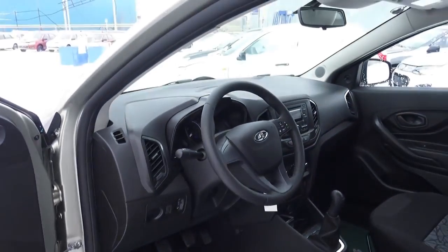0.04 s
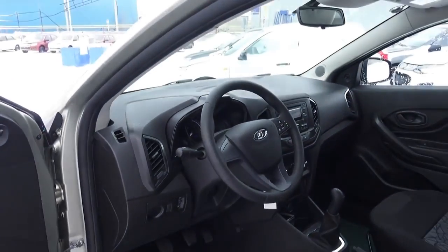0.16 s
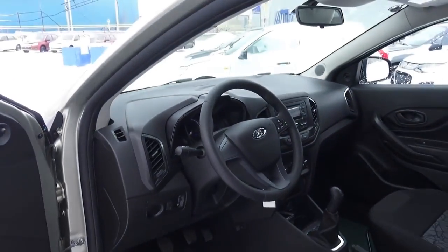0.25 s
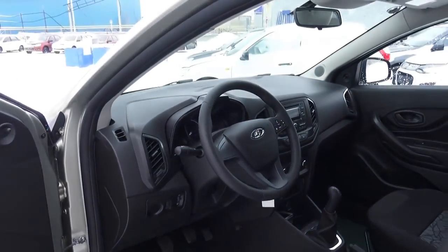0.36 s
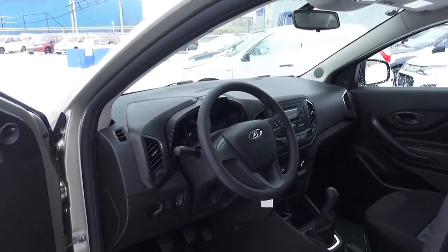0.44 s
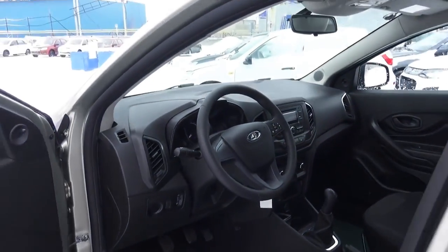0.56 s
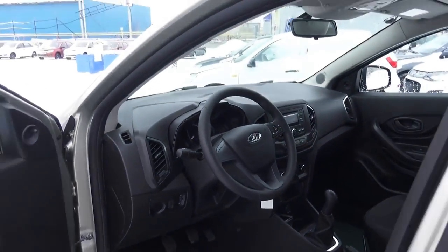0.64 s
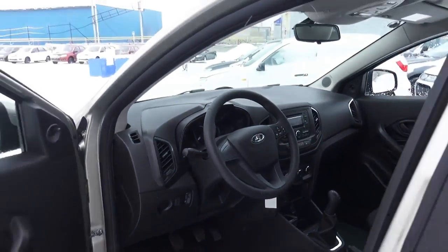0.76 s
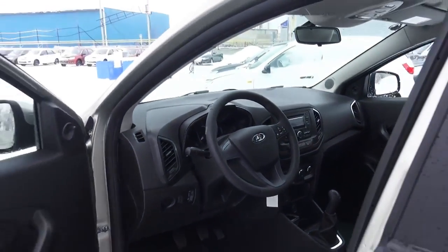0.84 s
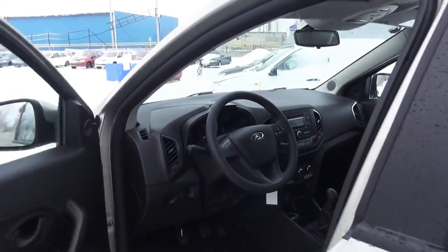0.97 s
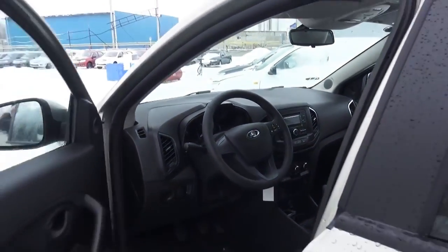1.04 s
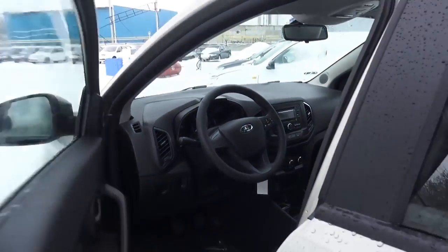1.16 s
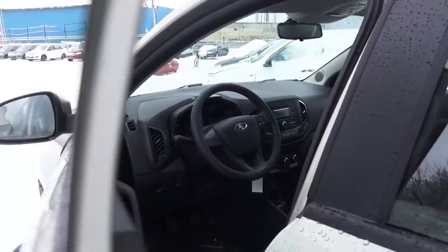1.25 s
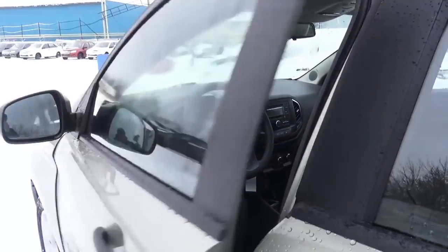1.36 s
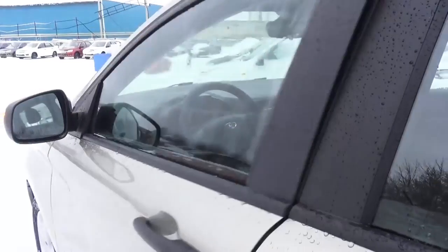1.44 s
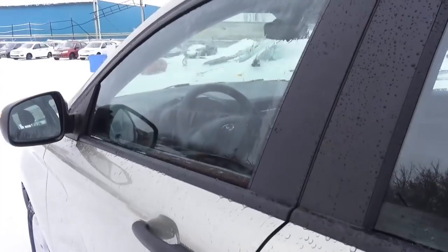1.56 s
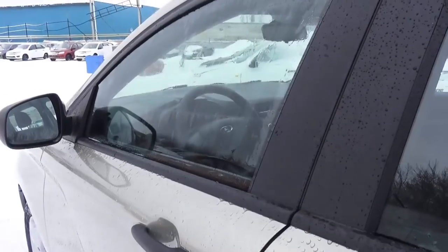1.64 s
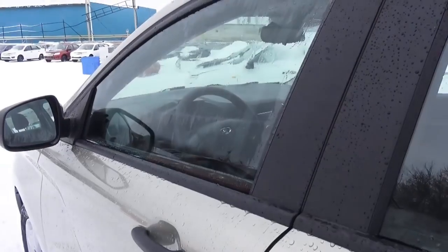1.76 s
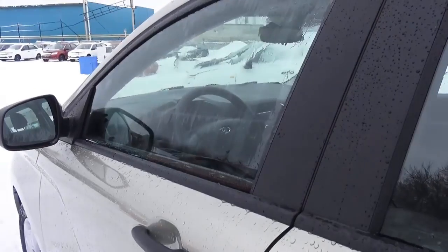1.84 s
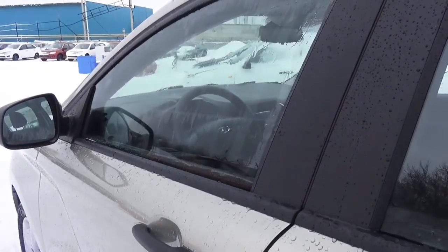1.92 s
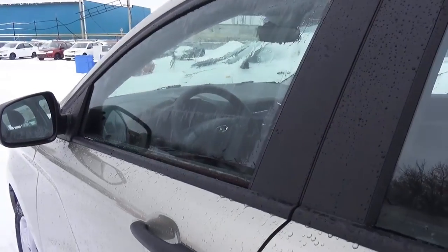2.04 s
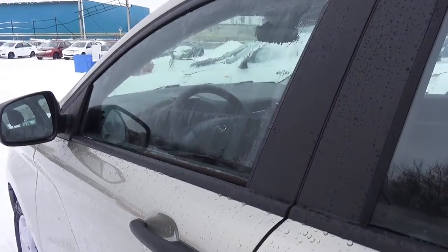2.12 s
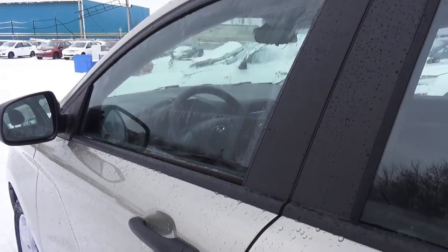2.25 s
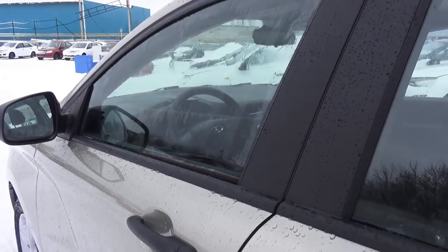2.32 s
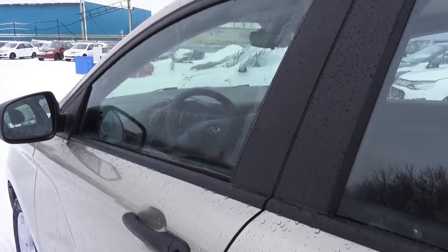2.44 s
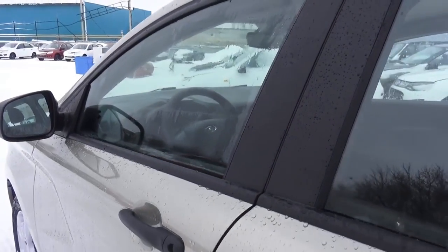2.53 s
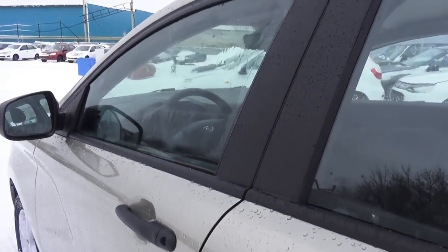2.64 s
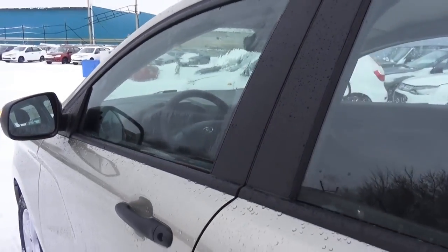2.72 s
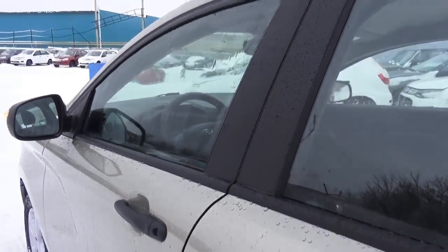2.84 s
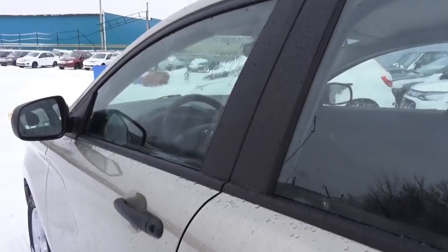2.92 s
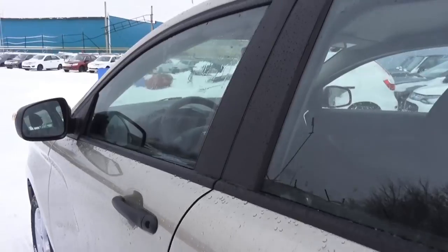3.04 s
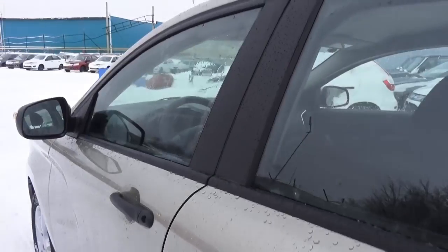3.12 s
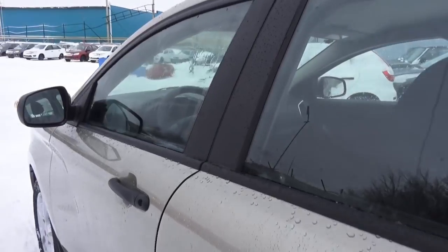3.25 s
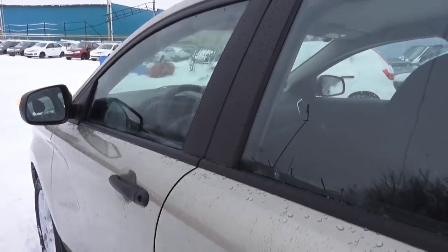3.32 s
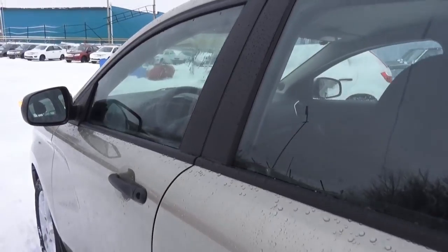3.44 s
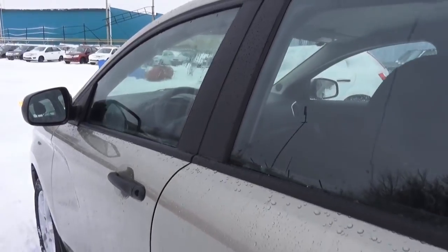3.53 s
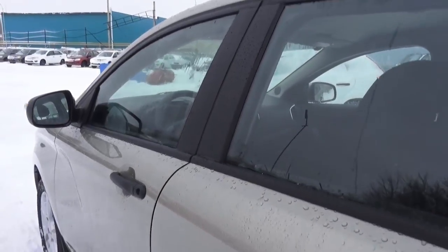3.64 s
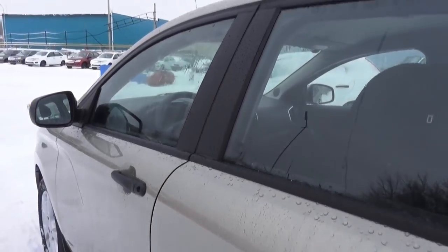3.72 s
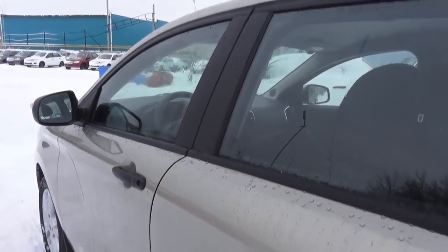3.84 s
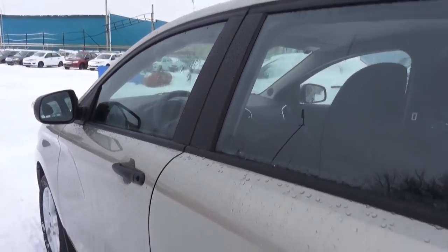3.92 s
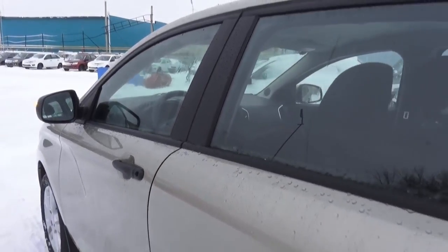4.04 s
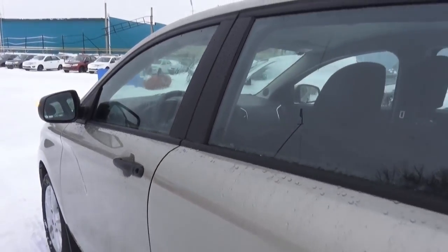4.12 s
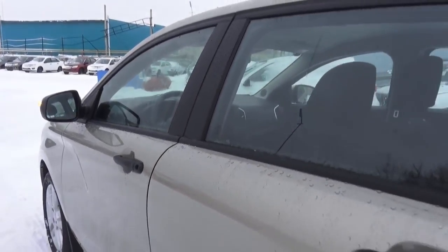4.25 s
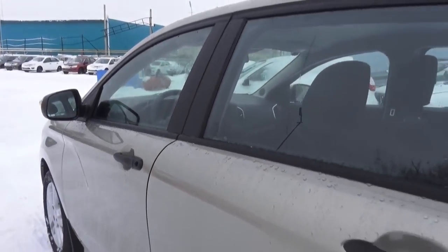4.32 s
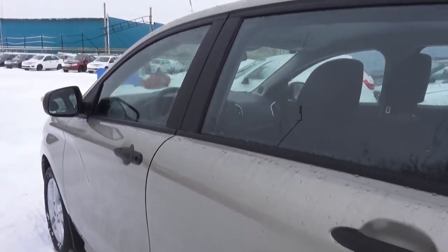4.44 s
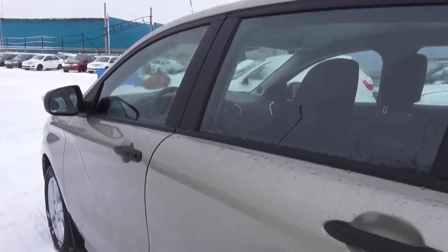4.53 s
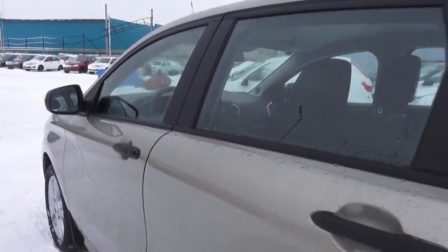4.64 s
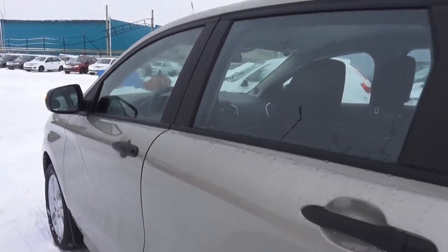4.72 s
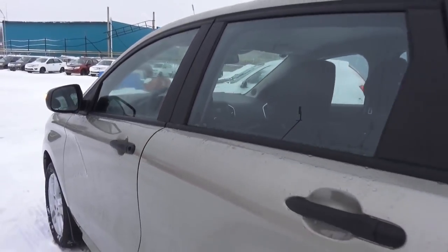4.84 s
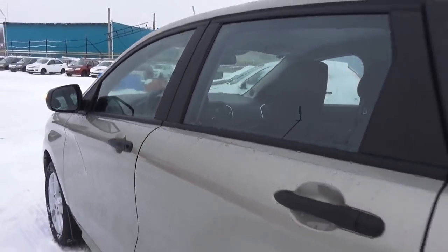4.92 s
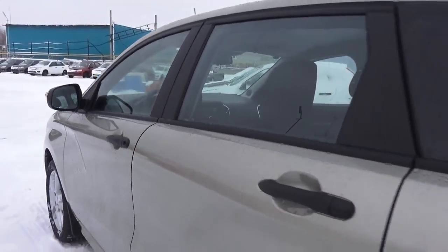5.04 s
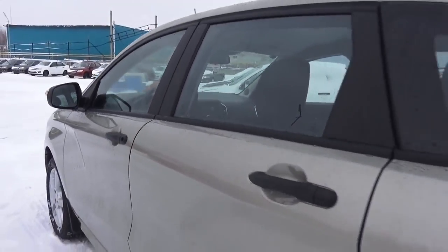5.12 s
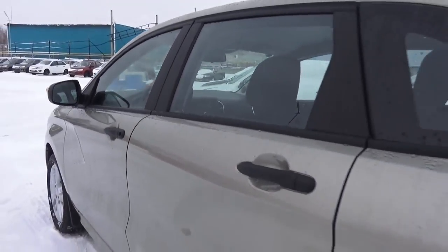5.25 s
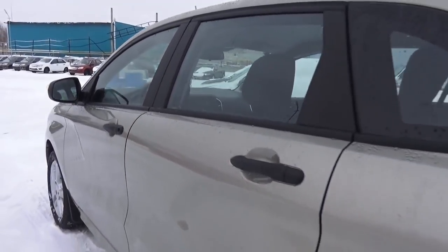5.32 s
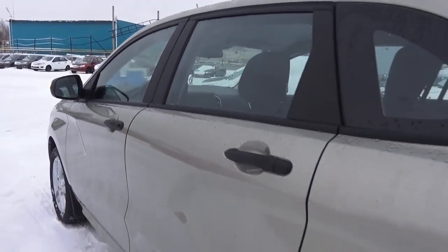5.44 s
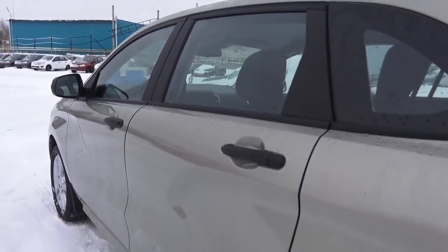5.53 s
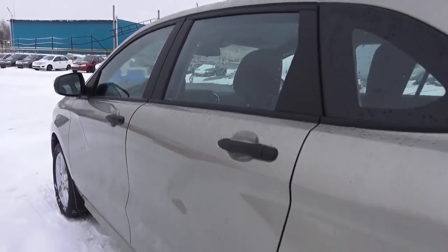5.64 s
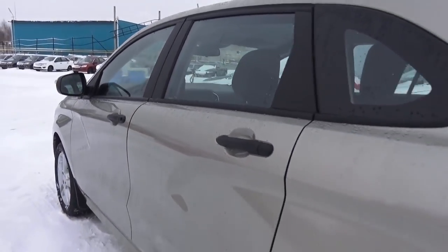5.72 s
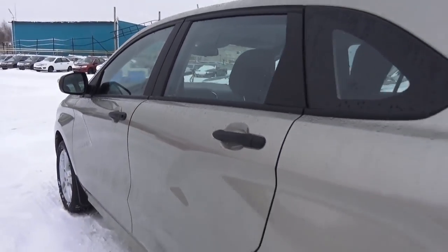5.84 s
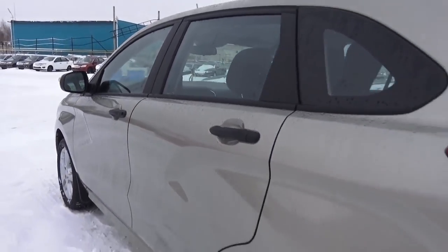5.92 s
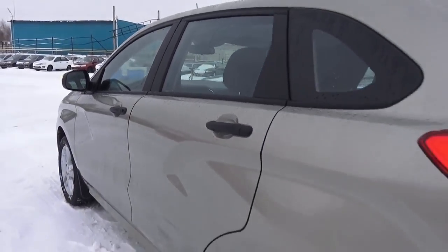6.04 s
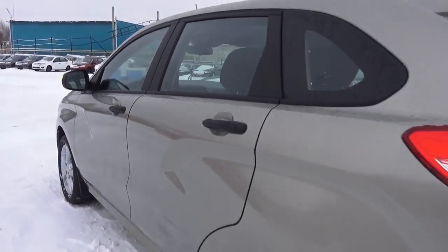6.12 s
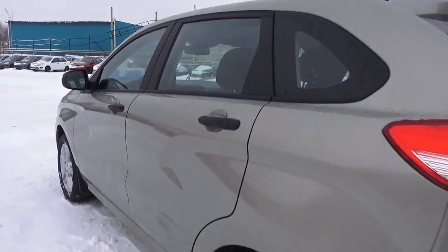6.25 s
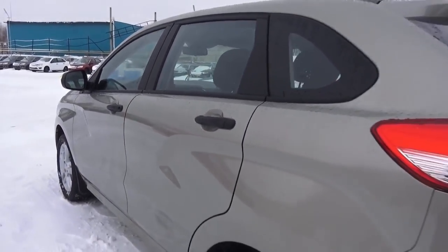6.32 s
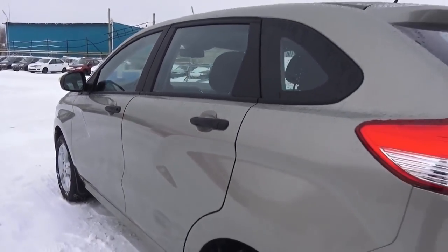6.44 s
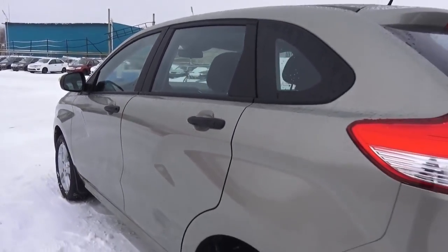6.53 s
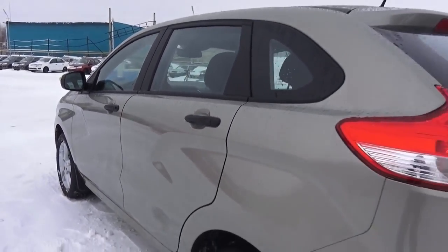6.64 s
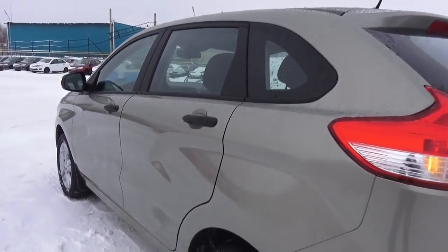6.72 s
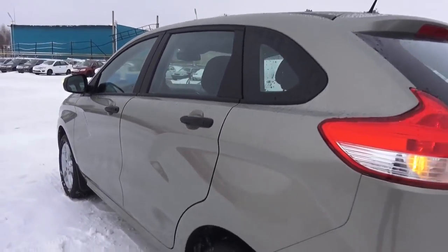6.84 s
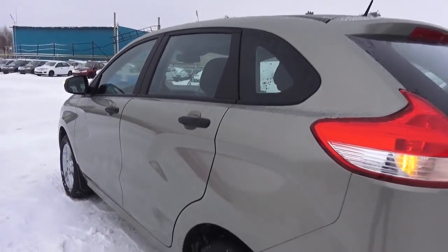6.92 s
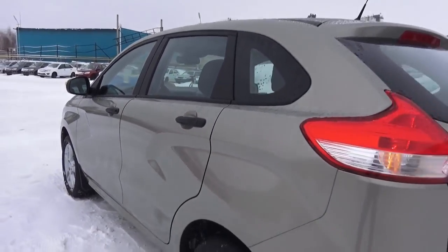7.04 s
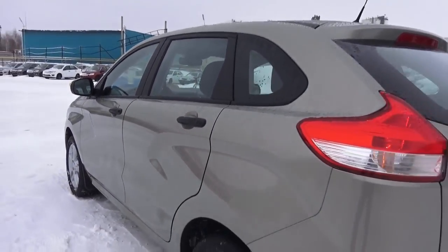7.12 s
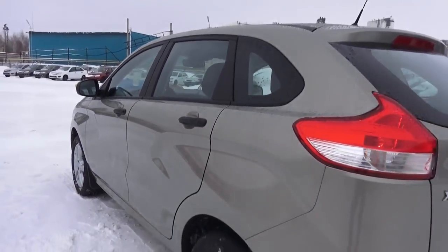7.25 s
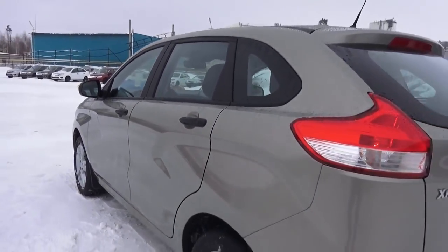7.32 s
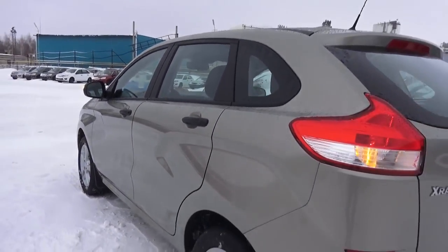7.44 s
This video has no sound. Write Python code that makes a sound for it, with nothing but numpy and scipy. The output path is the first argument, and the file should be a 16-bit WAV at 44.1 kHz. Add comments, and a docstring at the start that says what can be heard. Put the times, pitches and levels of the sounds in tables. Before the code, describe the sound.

A low engine idle hums steadily as a car door knocks, slams shut with a boom, then small ticks and rumbling gusts follow.

```python
"""A snowy lot, where a car idles while someone beside it swings the driver's door past its check and slams it.
Steel, door shell, panels and cabin air ring as damped modes; the latch adds noise bursts as it clatters.
The engine is a hum of firing-rate partials with throbbing noise, and the exhaust grows as we move back.
Filtered noise and low pushes make the gusts at the microphone; chirps, ticks, scuffs and cloth add detail.
Loud treble makes the gain control duck, then slowly recover."""
import sys
import numpy as np
from scipy.fft import rfft, irfft, next_fast_len
from scipy.io import wavfile
from scipy.ndimage import uniform_filter1d, minimum_filter1d, map_coordinates

SR = 44100
rng = np.random.default_rng(int(sys.argv[2]) if len(sys.argv) > 2 else 0)


def int16_out(signal):
    """Quantize to a 16-bit WAV file."""
    q = np.round(np.clip(np.atleast_2d(signal).T, -1, 1) * 32767)
    wavfile.write(sys.argv[1], SR, q.astype(np.int16))


N = 329868  # length in samples


def amp(db):
    """Decibels to gain."""
    return 10 ** (np.asarray(db) / 20)


def unit(x):
    """Scale to rms 1."""
    return x / np.sqrt(np.mean(x ** 2) + 1e-20)


def along(points, hz):
    """Read a curve of (Hz, value) points along a log frequency axis."""
    point_hz, value = np.transpose(points)
    return np.interp(np.log(hz + 1), np.log(point_hz + 1), value)


def curves(rows):
    """One value per sample for each column after the time."""
    s, *columns = np.transpose(rows)
    return [np.interp(np.arange(N) / SR, s, column) for column in columns]


def wobble(rate):
    """A smooth random curve with rate knots a second."""
    knots = rng.standard_normal(int(N * rate / SR) + 4)
    return map_coordinates(knots, [np.arange(N) * rate / SR])


def filtered(x, response):
    """Shape the spectrum of x with a gain that depends on frequency."""
    n = x.shape[-1]
    padded = next_fast_len(n + 8192)
    spectrum = rfft(x, padded) * response(np.fft.rfftfreq(padded, 1 / SR))
    return irfft(spectrum, padded)[..., :n]


# stereo width of the noises: pitch_hz, side_minus_mid_db
STEREO_WIDTH = [(60, -41), (150, -11.5), (330, -16.5), (800, -14), (1700, -14), (2600, -29), (4200, -20),
                (6400, 1), (10000, -3.5)]


def noise(colour_db, size=N):
    """Stereo noise of rms 1, nearly mono in the deep bass and wide in the treble."""
    def mid_side_gain(hz):
        mid_db = colour_db(hz)
        return amp([mid_db, mid_db + along(STEREO_WIDTH, hz)])

    mid, side = filtered(rng.standard_normal((2, size)), mid_side_gain)
    return unit(np.array([mid + side, mid - side]))


def rush(spectrum, size=N):
    """Noise with a (Hz, dB per Hz) spectrum, at rms 1."""
    return noise(lambda hz: along(spectrum, hz), size=size)


def fade(t, t60, attack):
    """A quick rise and an exponential decay."""
    return np.exp(-np.log(1000) * t / t60) * (1 - np.exp(-t / attack))


def swell(t, length, attack, release):
    """Rise, hold until length, then die away."""
    return np.clip(t / attack, 0, 1) * np.exp(-np.maximum(t - length, 0) / release)


def arch(t, length):
    """A rounded rise and fall that lasts for length."""
    return np.sin(np.pi * np.clip(t / length, 0, 1))


def ring(modes, t, attack, scatter_db, detune=.01):
    """Damped modes, a little different in strength and pitch at each blow."""
    out = 0
    for hz, db, t60 in modes:
        strength, bend = rng.standard_normal(2)
        tone = np.sin(2 * np.pi * hz * (1 + bend * detune) * t)
        out = out + amp(db + scatter_db * strength) * fade(t, t60, attack) * tone
    return out


def add(track, s, sound):
    """Mix a sound into a track at time s."""
    part = track[:, round(s * SR):][:, :sound.shape[-1]]
    part += sound[..., :part.shape[-1]]


# ring of the latch steel: pitch_hz, level_db, t60_s
STEEL_MODES = [(1150, -1, .05), (1310, 0, .045), (1440, -1, .04), (1610, -5, .055), (2250, -12, .04),
               (2720, -8, .05), (3330, -13, .04), (3770, -11, .045), (4240, -10, .042), (4570, -15, .035),
               (5320, -20, .035), (5990, -17, .04), (8620, -24, .02)]
STEEL_SCATTER_DB = 5.5  # each mode drops by a random share of this


def clack(brightness_db, t):
    """The latch steel rings on the same pitches at every contact, tilted by brightness in dB per octave."""
    out = 0
    for hz, db, t60 in STEEL_MODES:
        strength, cycle = rng.random(2)
        tilt_db = brightness_db * np.log2(hz / STEEL_MODES[1][0])
        mode_db = db + tilt_db + STEEL_SCATTER_DB * (strength - 1.0)
        out = out + amp(mode_db) * fade(t, t60, attack=.0001) * np.sin(2 * np.pi * (hz * t + cycle))
    return out


# latch and window contacts of the slam:
# start_s, steel_ring_db, brightness_db_per_octave, clank_db, crack_db, t60_s
LATCH_CONTACTS = [(1.5186, -10.5, -.5, -24, -27, .03), (1.5234, -13, -4, -23, -31, .03),
                  (1.5292, -19, 0, -14, -24, .014), (1.5332, -34, 3, -21, -25, .08),
                  (1.5425, -22, 2.5, -18, -18, .07), (1.55, -30, 2, -13, -27, .035),
                  (1.5566, -25.5, 6, -20, -15, .05), (1.5622, -27, 2, -17.5, -27, .085),
                  (1.5918, -26, 3.5, -19, -21, .047)]
# spectrum of the low clank: pitch_hz, density_db_per_hz
CLANK_SPECTRUM = [(240, -22), (400, 3.5), (553, -9), (861, -2), (1180, -14), (1420, -3), (1870, -15.5),
                  (3250, -23), (3540, -20), (4600, -23), (5010, -34), (6140, -39), (7000, -40), (9100, -62),
                  (15400, -120)]
# spectrum of the bright crack: pitch_hz, density_db_per_hz
CRACK_SPECTRUM = [(1060, -29), (1800, 0), (2680, 0), (3180, -4.5), (4410, -4.5), (5080, -10), (6100, -10.5),
                  (7850, -14.5), (8730, -10.5), (12200, -19.5), (14200, -42), (15000, -99)]
SQUEEZE_DB, SQUEEZE_HISS_DB = -25, -37
SQUEEZE_T60_S = .11  # a reversed decay, so it climbs 60 dB in this time
LATCH_WIDTH = .5  # share of side kept: the latch is close and in front
SNAP_T60_S, SNAP_DB, CHATTER_DB, CHATTER_PER_S = 0.0049, -26, 2.5, 900


def latch():
    """Air rushes from the narrowing gap until the latch strikes; loose parts chatter after each snap."""
    out, t = np.zeros((2, N)), np.arange(SR // 2) / SR
    air = amp(SQUEEZE_DB) * rush(CLANK_SPECTRUM, size=len(t))
    air = air + amp(SQUEEZE_HISS_DB) * rush(CRACK_SPECTRUM, size=len(t))
    squeeze = air * fade(t, SQUEEZE_T60_S, attack=0.0018)[::-1]
    add(out, LATCH_CONTACTS[0][0] - len(t) / SR, squeeze)
    for s, steel_db, brightness_db, clank_db, crack_db, t60 in LATCH_CONTACTS:
        steel = amp(steel_db) * clack(brightness_db, t)
        clank = amp(clank_db) * rush(CLANK_SPECTRUM, size=len(t))
        crack = amp(crack_db) * rush(CRACK_SPECTRUM, size=len(t))
        chatter = unit(amp(CHATTER_DB * wobble(CHATTER_PER_S)[:len(t)]))
        grit = (clank + crack) * chatter * fade(t, t60, attack=0.00041)
        snap = amp(SNAP_DB) * rush(CRACK_SPECTRUM, size=len(t)) * fade(t, SNAP_T60_S, attack=.0001)
        add(out, s, snap + steel + grit)
    mid = out.mean(0)
    return mid + LATCH_WIDTH * (out - mid)


# a loose shell rattles on after a jolt, ever slower and softer
RATTLE_DB, RATTLE_LOSS_DB, RATTLE_GAP_S, RATTLE_SLOWING = -21.5, 5, .041, 1.3


def rattle(s, count):
    """The (s, dB) knocks that follow a jolt at time s."""
    k = np.arange(count)
    times = s + np.cumsum(RATTLE_GAP_S * RATTLE_SLOWING ** k)
    return list(zip(times, RATTLE_DB - RATTLE_LOSS_DB * k))


# bumps over the check arm: start_s, shell_level_db, pillar_level_db
CHECK_BUMPS = [(1.0684, -10.5, -19.5), (1.0795, -16.5, -16.5), (1.089, -12.5, -20), (1.1, -9.5, -16.5)]
# low thud of the hinge pillar: pitch_hz, level_db, t60_s
PILLAR_MODES = [(178, -1, .18), (262, -1.5, .1), (555, 2, .07)]
# ring of the door shell: pitch_hz, level_db, t60_s
DOOR_MODES = [(142, -8.5, 0.24), (178, -8, 0.31), (227, -8, 0.46), (263, 1, 0.069), (307, -11.5, 0.47),
              (404, -9.5, 0.14), (494, -2.5, 0.12), (530, -10, 0.17), (562, -4, 0.091), (624, -40, .11)]
# the door meets the seal, presses home and seats in the frame: start_s, shell_level_db
SLAM_BLOWS = [(1.529, -14), (1.549, -15.5), (1.573, -21), (1.592, -18)]
# rumble of the swing and shudder of the body: pitch_hz, density_db_per_hz
SHUDDER_SPECTRUM = [(50, -23), (100, -2), (170, 3.5), (260, 2), (340, 0.5), (420, -4.5), (600, -13),
                    (1000, -17), (2500, -60)]
# airy hiss, for the door's swish and the engine bay: pitch_hz, density_db_per_hz
HISS_SPECTRUM = [(700, -56), (1600, 1), (2400, 0.5), (3300, -1.5), (4200, -6.5), (5200, -11), (6800, -14.5),
                 (7400, -13), (8000, -15), (10000, -16.5), (11500, -20), (14000, -23), (15500, -80)]
HELD_T60_S = .17  # extra damping while the check arm holds the door
SWING_S, SWING_LENGTH_S, SWING_RISE_S, SWING_RUMBLE_DB, SWING_SWISH_DB = 0.65, 0.84, 0.32, -37.5, -54


def shell():
    """The door shell rumbles as it swings, knocks and rattles at the check arm, and rings at the frame."""
    out, t = np.zeros((2, N)), np.arange(SR // 2) / SR
    for s, db, pillar_db in CHECK_BUMPS:
        add(out, s, amp(pillar_db) * ring(PILLAR_MODES, t, attack=0.0025, scatter_db=1))
        bump = ring(DOOR_MODES, t, attack=0.0025, scatter_db=3.5)
        add(out, s, amp(db) * bump * fade(t, HELD_T60_S, attack=.0012))
    for s, db in rattle(CHECK_BUMPS[-1][0], count=4) + list(SLAM_BLOWS):
        add(out, s, amp(db) * ring(DOOR_MODES, t, attack=0.0015, scatter_db=3.5))
    swing = amp(SWING_RUMBLE_DB) * rush(SHUDDER_SPECTRUM) + amp(SWING_SWISH_DB) * rush(HISS_SPECTRUM)
    return out + swing * swell(np.arange(N) / SR - SWING_S, SWING_LENGTH_S, SWING_RISE_S, release=0.033)


# ring of the closed cabin's air: pitch_hz, level_db, t60_s
CABIN_MODES = [(30, 0, .8), (64, -2.5, .38), (83, -.5, .5), (110, -9, .4), (157, -5.5, .45),
               (194.3, -7.5, .48)]
# dull thumps as the door rocks against its seal: start_s, level_db
SEAL_REBOUNDS = [(1.56, -19), (1.645, -17), (1.676, -23), (1.752, -26)]
# outer panel shaken by those thumps: pitch_hz, level_db, t60_s
PANEL_MODES = [(162, 0, .22), (232, -6.5, .18), (277, -3.5, .2), (341, -6, .2), (500, -15, .14)]
BOOM_S, BOOM_DB, BOOM_HOLD_S = 1.58, -11, .17
SHUDDER_S, SHUDDER_T60_S, SHUDDER_DB = 1.531, .62, -18.5


def body():
    """The trapped cabin air booms, the body shudders and the outer panel answers each seal thump."""
    out, t = np.zeros((2, N)), np.arange(SR // 2) / SR
    boom = ring(CABIN_MODES, t, attack=0.0022, scatter_db=2.2)
    add(out, BOOM_S, amp(BOOM_DB) * boom * swell(t, BOOM_HOLD_S, attack=.001, release=.04))
    shudder = rush(SHUDDER_SPECTRUM, size=len(t)) * fade(t, SHUDDER_T60_S, attack=0.0078)
    add(out, SHUDDER_S, amp(SHUDDER_DB) * shudder)
    for s, db in SEAL_REBOUNDS:
        add(out, s, amp(db) * ring(PANEL_MODES, t, attack=0.0039, scatter_db=2.5))
    return out


# narrow singing of the belt drive: centre_hz, width_hz, level_relative_to_whirr_db
SINGING_BANDS = [(177.5, 10.5, -8), (376.8, 6, -10), (610.7, 10.5, -5.5), (1279, 79, -6),
                 (7430, 110, -28.5)]


def singing():
    """Pulleys and alternator sing in a few narrow, fuzzy bands of noise."""
    out = 0
    for centre, width, db in SINGING_BANDS:
        out = out + amp(db) * noise(lambda hz: -10 * np.log10(1 + (2 * (hz - centre) / width) ** 4))
    return out


# exhaust level as we near the tail of the car: time_s, level_db
EXHAUST_LEVEL = [(0, -25), (1.8, -22.5), (3.2, -21), (6.3, -19), (6.7, -20), (7.48, -22)]
# balance of the exhaust partials: multiple_of_firing_rate, level_db
EXHAUST_ORDERS = [(1, -14.5), (2, 2.5), (3, -18.5), (4, -22.5), (5, -31)]
# hollow blowing of the tailpipe: pitch_hz, density_db_per_hz
PIPE_SPECTRUM = [(400, -35), (540, -4), (620, 5), (690, -12), (850, -45)]
# engine bay heard from along the car's side: time_s, block_db, belt_whirr_db, hiss_db
BAY_LEVELS = [(0, -38, -43.5, -50), (1.4, -35.5, -46, -47), (2.1, -36, -45, -48.5),
              (2.55, -35.5, -44, -46.5), (3.7, -37.5, -39.5, -48), (4.7, -34, -40.5, -45.5),
              (5.4, -36, -44, -47), (6.25, -36.5, -47, -48), (7.48, -38, -47, -47.5)]
# rumble of the engine block: pitch_hz, density_db_per_hz
BLOCK_SPECTRUM = [(20, 6), (70, 2), (120, -1), (185, 1), (240, 0), (330, -1.5), (380, -2), (450, -3.5),
                  (600, 0), (700, -8), (950, -7), (1500, -12), (2500, -46)]
# whirr of the belts: pitch_hz, density_db_per_hz
WHIRR_SPECTRUM = [(600, -0.5), (1000, -20), (1170, 3), (1280, -5), (1420, 3.5), (1550, -11), (2100, -12),
                  (4000, -56)]
IDLE_HZ = 56.03  # mean exhaust note, twice the firing rate
# the tailpipe swells as we pass the rear wheel; PIPE_DB is relative to the exhaust
PIPE_S, PIPE_LENGTH_S, PIPE_DB, PIPE_SWELL_DB = 5.67, 0.91, -40.5, 16
HISS_FLICKER_DB, HISS_THROB_DB = .7, .3


def engine():
    """Four cylinders idle: firing-rate partials hum, and block, belt and hiss noise throb at each firing."""
    exhaust_db, = curves(EXHAUST_LEVEL)
    block_db, whirr_db, hiss_db = curves(BAY_LEVELS)
    firing_hz = IDLE_HZ / 2 * (1 + .012 * wobble(8.3))
    firing = 2 * np.pi * np.cumsum(firing_hz) / SR
    hum = sum(amp(db + 0.5 * wobble(14)) * np.sin(k * firing) for k, db in EXHAUST_ORDERS)
    throb = np.cos(firing + 0.49 * wobble(22))
    block = amp(block_db + 0.79 * wobble(9)) * unit(amp(0.47 * throb) * rush(BLOCK_SPECTRUM))
    whirr_gain = amp(whirr_db + 0.28 * wobble(8))
    whirr = whirr_gain * (unit(amp(2.6 * throb) * rush(WHIRR_SPECTRUM)) + singing())
    passing_db = PIPE_SWELL_DB * arch(np.arange(N) / SR - PIPE_S, PIPE_LENGTH_S)
    pipe = amp(exhaust_db + PIPE_DB + passing_db) * rush(PIPE_SPECTRUM)
    flicker_db = HISS_FLICKER_DB * wobble(11) + HISS_THROB_DB * throb
    hiss = amp(hiss_db + flicker_db) * rush(HISS_SPECTRUM)
    return amp(exhaust_db) * unit(hum) + pipe + block + whirr + hiss


# short squeaky chirps: start_s, pitch_hz, tone_db, octave_above_db
CHIRP_NOTES = [(0.6365, 1850, -28, -31), (1.315, 1840, -33, -38), (3.042, 1880, -31, -47),
               (3.329, 3050, -36, -65), (3.452, 1920, -35.5, -51)]
# each slides up by a share of its pitch and wavers by another
CHIRP_LENGTH_S, CHIRP_RISE, CHIRP_WAVER, CHIRP_RASP_PER_S = 0.005, 0.085, .07, 1200


def chirps():
    """Something sticks and slips for a few milliseconds: a raspy rising tone with its octave."""
    out, t = np.zeros((2, N)), np.arange(SR // 10) / SR
    for s, start_hz, *levels in CHIRP_NOTES:
        rise = CHIRP_RISE * np.minimum(t / CHIRP_LENGTH_S, 1)
        rasp = CHIRP_WAVER * wobble(CHIRP_RASP_PER_S)[:len(t)]
        phase = 2 * np.pi * np.cumsum(start_hz * (1 + rise + rasp)) / SR
        tone = sum(amp(db) * np.sin(k * phase) for k, db in enumerate(levels, 1))
        add(out, s, tone * swell(t, CHIRP_LENGTH_S, attack=0.003, release=0.0056))
    return out


# dry ticks: start_s, peak_db before the soft top, pitch_hz, t60_s, click_db
DRY_TICKS = [(2.584, -31, 2400, .005, -32), (2.691, -15, 11500, 0.0025, -28), (3.109, -42, 8200, .01, -42),
             (3.298, -38, 8300, .01, -37), (3.729, -34, 10300, .018, -34), (4.262, -37, 5400, .012, -42),
             (4.642, -24, 1420, 0.01, -38), (5.15, -32, 13140, .0027, -45), (6.316, -38, 8000, .002, -35),
             (6.48, -41, 8500, .01, -40), (6.9412, -22, 2700, 0.002, -21)]
# soft scuffs: start_s, peak_db before the soft top, pitch_hz, t60_s
SOFT_SCUFFS = [(.303, -34.5, 3000, .05), (.978, -33, 3000, 0.03), (1.356, -28, 830, 0.15),
               (1.997, -35, 3470, 0.071), (3.31, -35, 2940, 0.25)]
SCUFF_OCTAVES = 0.3
CLICK_HZ, CLICK_OCTAVES, CLICK_T60_S = 5200, 1.2, .004  # the broad click that starts every tick
OCTAVE_TICK_T60_S = 0.00031  # this t60 gives a band setting of one octave; longer ticks are narrower
CHIRP_CLICK_DB = -5  # dry click at the start of a chirp, relative to its tone
SOFT_TOP_HZ = 13400  # small contacts are too soft to sound much above this


def small_sounds():
    """Scuffs, ticks and the dry click of the chirps: brief bursts of noise, each through one resonant band."""
    out, t, lead = np.zeros((2, N)), np.arange(SR // 4) / SR, SR // 100
    bursts = [(s, db + CHIRP_CLICK_DB, 2600, .6, .035) for s, _, db, _ in CHIRP_NOTES]
    bursts += [(s, db, hz, SCUFF_OCTAVES, t60) for s, db, hz, t60 in SOFT_SCUFFS]
    bursts += [(s, db, hz, np.sqrt(OCTAVE_TICK_T60_S / t60), t60) for s, db, hz, t60, _ in DRY_TICKS]
    bursts += [(s, db, CLICK_HZ, CLICK_OCTAVES, CLICK_T60_S) for s, *_, db in DRY_TICKS]
    for s, db, centre_hz, octaves, t60 in bursts:
        burst = rng.standard_normal(len(t)) * fade(t, t60, attack=0.017 * t60)
        burst = np.pad(burst, (lead, 0))  # room for the filter to ring ahead of the burst
        sound = filtered(burst, lambda hz: (1 + (np.log2((hz + 1) / centre_hz) / octaves) ** 4) ** -.5)
        add(out, s - lead / SR, amp(db) * sound / np.abs(sound).max())
    return filtered(out, lambda hz: 1 / (1 + (hz / SOFT_TOP_HZ) ** 8))


# brushes of clothing: start_s, length_s, level_db
CLOTH_BRUSHES = [(0.7, .26, -58), (1.15, 0.066, -50), (1.308, 0.18, -52), (3.268, 0.17, -53.5),
                 (6.72, .34, -60)]
# thin hiss of cloth: pitch_hz, density_db_per_hz
CLOTH_SPECTRUM = [(1500, -20), (3300, -2), (5500, 1), (9500, -3), (13000, -10), (15500, -40)]
RUSTLE_GRAIN_DB = 1


def rustles():
    """Clothing brushes softly near the microphone in a thin, grainy hiss."""
    out, t = np.zeros((2, N)), np.arange(SR // 2) / SR
    for s, length, db in CLOTH_BRUSHES:
        grain = unit(amp(RUSTLE_GRAIN_DB * wobble(310)[:len(t)]))
        add(out, s, amp(db) * rush(CLOTH_SPECTRUM, size=len(t)) * grain * arch(t, length))
    return out


# wind rumble at the microphone: pitch_hz, density_db_per_hz
BUFFET_SPECTRUM = [(15, -20), (35, -3), (60, 2.5), (85, 5), (150, -4.5), (250, -14.5), (400, -26.5),
                   (700, -34), (1500, -89)]


def buffet(pitch, size):
    """Wind rumble, shifted up or down by a pitch factor."""
    return noise(lambda hz: along(BUFFET_SPECTRUM, hz / pitch), size=size)


# gusts on the microphone: start_s, length_s, level_db, pitch_factor
WIND_GUSTS = [(4.813, 0.015, -28, 1.4), (4.909, 0.091, -33.5, 1.4), (5.652, 0.093, -26.5, 1.6),
              (5.908, 0.17, -28, 1.3), (6.128, 0.09, -28, 1.07), (6.22, 0.45, -24, 1.02),
              (6.88, 0.13, -26.5, 1.1), (7.137, 0.34, -24.5, 0.91)]
# big eddies that thump the microphone: start_s, push_db, pitch_hz, rough_edge_db
WIND_EDDIES = [(4.824, -18.5, 160, -31), (5.664, -26, 150, -31), (5.729, -25, 150, -28),
               (5.915, -24, 170, -40), (5.963, -17, 125, -38), (6.012, -17, 90, -29),
               (6.045, -18, 140, -35), (6.235, -17, 101, -32), (6.272, -14, 130, -28),
               (6.283, -10, 58, -40), (6.325, -22, 200, -28), (6.345, -19, 150, -26),
               (6.405, -15, 105, -28), (6.476, -16.5, 160, -27), (6.535, -13.5, 98.6, -34),
               (6.615, -20, 130, -33), (6.65, -22, 150, -32), (7.165, -15.5, 110, -40),
               (7.215, -21, 130, -36), (7.415, -10, 71, -31)]
# rough edge of an eddy: pitch_hz, density_db_per_hz
CRUNCH_SPECTRUM = [(130, -10), (270, 0), (400, -10), (620, -11), (800, -26), (1600, -56)]
GUST_ATTACK_S, GUST_RELEASE_S, BREEZE_DB, LUMPS_DB = 0.0063, 0.033, -37.5, 1.8
# an eddy pushes for a few cycles; its puff, relative to the push, is wind rumble at the eddy's pitch
EDDY_CYCLES, PUFF_DB, BUFFET_CENTRE_HZ, CRUNCH_S = 2.67, -6, 90, .02


def wind():
    """Gusts rumble in lumps over a light breeze; big eddies land as a low push with a puff and a rough edge."""
    out, t = amp(BREEZE_DB) * rush(BUFFET_SPECTRUM), np.arange(SR) / SR
    for s, length, db, pitch in WIND_GUSTS:
        gust = buffet(pitch, size=len(t)) * swell(t, length, GUST_ATTACK_S, GUST_RELEASE_S)
        add(out, s, amp(db) * gust)
    out = out * unit(amp(LUMPS_DB * wobble(35)))
    t = t[:SR // 4]
    for s, db, hz, crunch_db in WIND_EDDIES:
        push = arch(t, EDDY_CYCLES / hz) * np.sin(2 * np.pi * (hz * t + rng.random()))
        puff = buffet(hz / BUFFET_CENTRE_HZ, size=len(t)) * fade(t, t60=0.12, attack=0.0064)
        crunch = rush(CRUNCH_SPECTRUM, size=len(t)) * swell(t, CRUNCH_S, attack=0.0071, release=0.0084)
        add(out, s, amp(db) * (push + amp(PUFF_DB) * puff) + amp(crunch_db) * crunch)
    return out


def scene():
    """Everything sounds in open air over snow, with no echo."""
    return engine() + wind() + shell() + latch() + body() + chirps() + rustles() + small_sounds()


def gain_control(x, threshold_db, depth_db, hold, release):
    """Loud sound above 900 Hz turns the gain down; the cut holds, then creeps back at a steady dB rate."""
    sensed = filtered(x.mean(0), lambda hz: hz > 900)
    power = np.abs(uniform_filter1d(sensed ** 2, SR // 100))
    level_db = 10 * np.log10(power + 1e-12)
    cut_db = np.clip(level_db - threshold_db, 0, depth_db)
    span = 2 * int(hold * SR / 2) + 1
    held = -minimum_filter1d(-cut_db, span, origin=span // 2)  # the largest recent cut
    recovery = np.arange(N) / SR * depth_db / release
    return x * amp(recovery - np.maximum.accumulate(held + recovery))


# colour difference of the two microphone capsules: pitch_hz, left_minus_right_db
CAPSULE_COLOUR = [(60, 2.5), (92, 6), (140, -1), (230, -0.5), (330, -1.5), (520, 4), (770, -3.5),
                  (1170, -0.5), (1790, -1.5), (2700, 0.3), (10000, 0.5)]
DUCK_THRESHOLD_DB, DUCK_DEPTH_DB, DUCK_HOLD_S, DUCK_RELEASE_S = -18, 4.5, 0.32, 1
TOP_HZ = 15800


def record(dry):
    """The capsules colour each side, the gain ducks, peaks round off and the top is cut at the band limit."""
    x = filtered(dry, lambda hz: amp(np.outer([.5, -.5], along(CAPSULE_COLOUR, hz))))
    x = gain_control(x, DUCK_THRESHOLD_DB, DUCK_DEPTH_DB, DUCK_HOLD_S, DUCK_RELEASE_S)
    x = x / (1 + np.abs(x / .62) ** 4) ** (1 / 4)  # soft ceiling at .62
    return filtered(x, lambda hz: hz < TOP_HZ)


dry = scene()
out = record(dry)
int16_out(out)
```